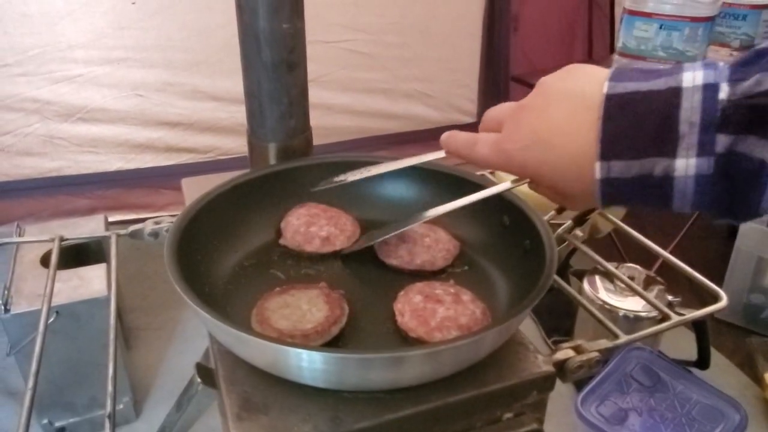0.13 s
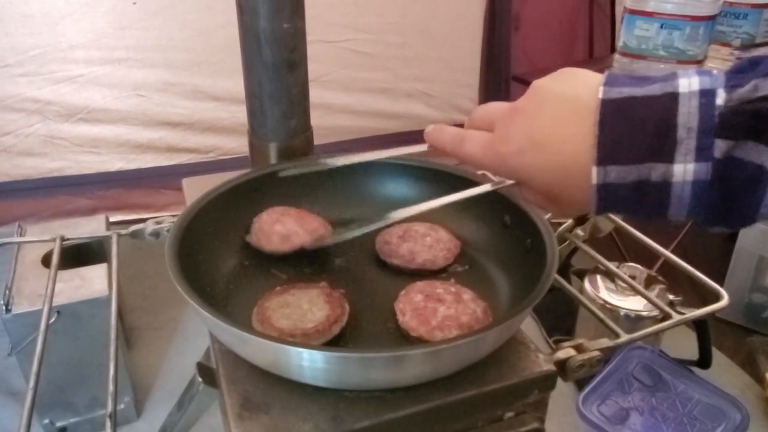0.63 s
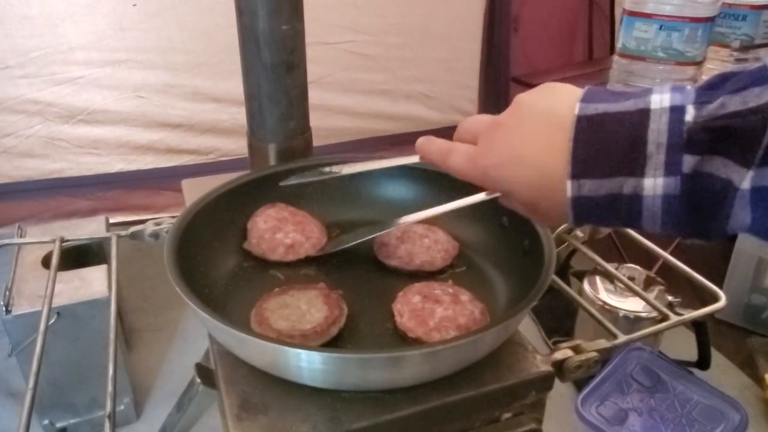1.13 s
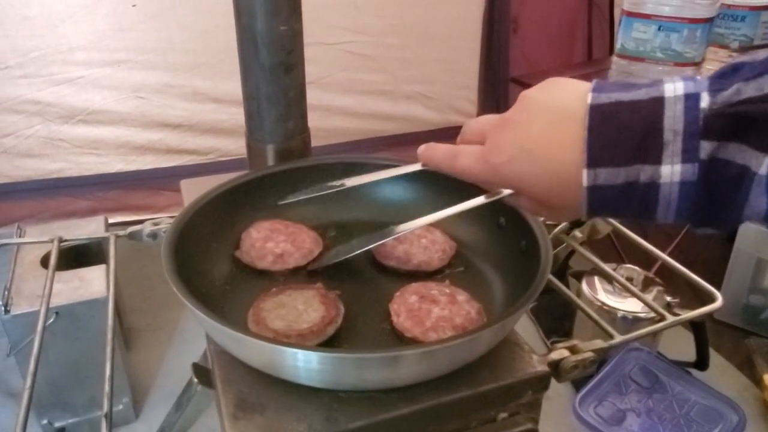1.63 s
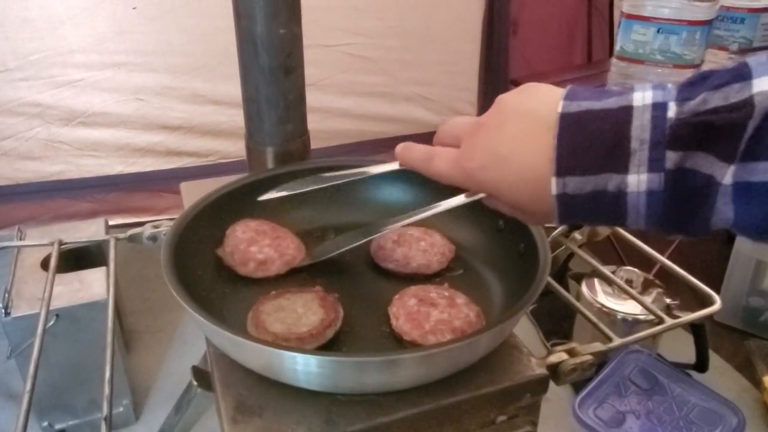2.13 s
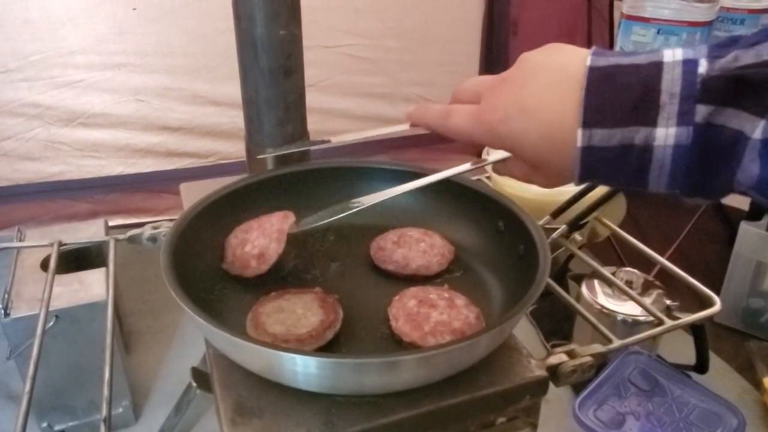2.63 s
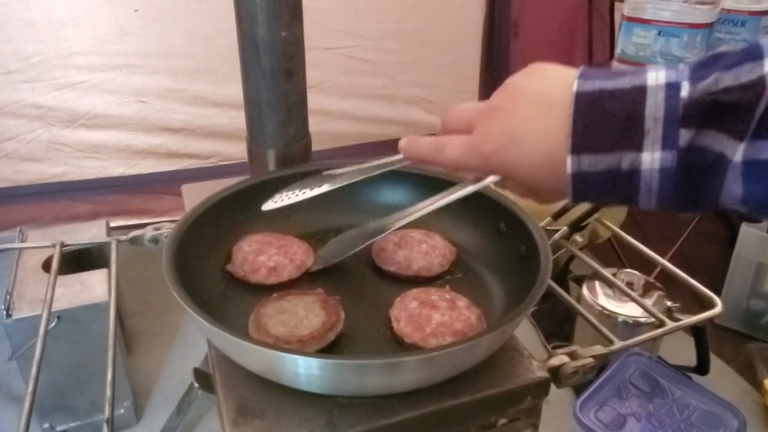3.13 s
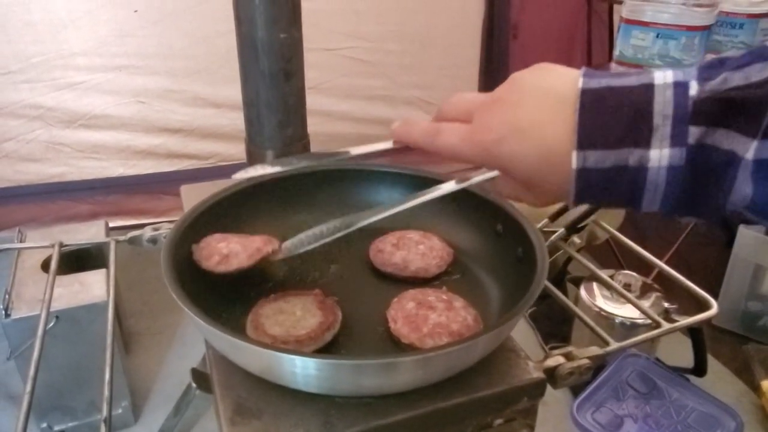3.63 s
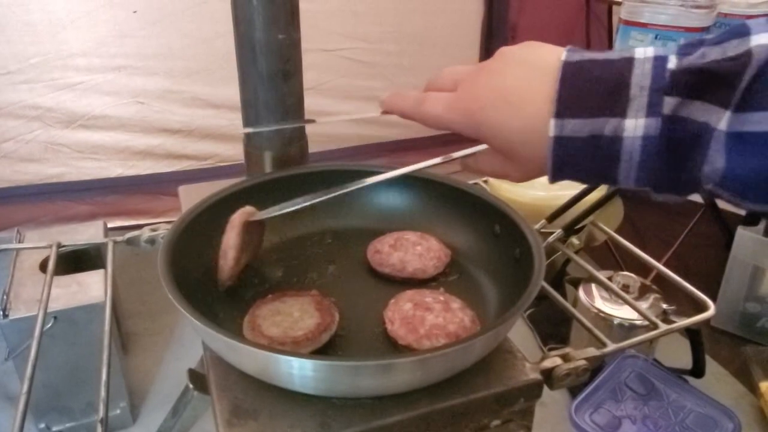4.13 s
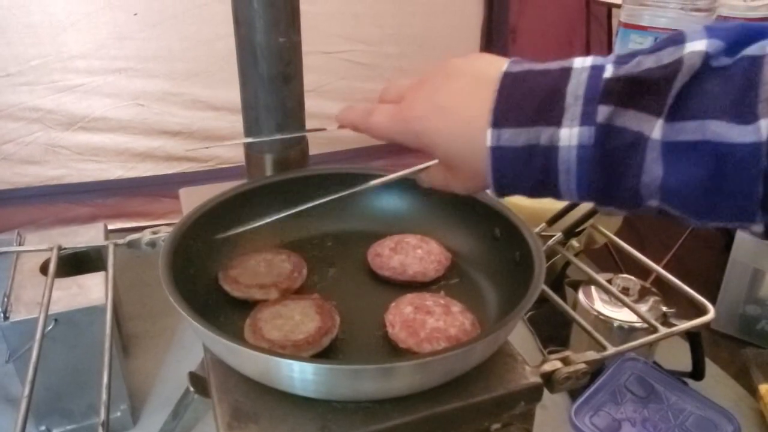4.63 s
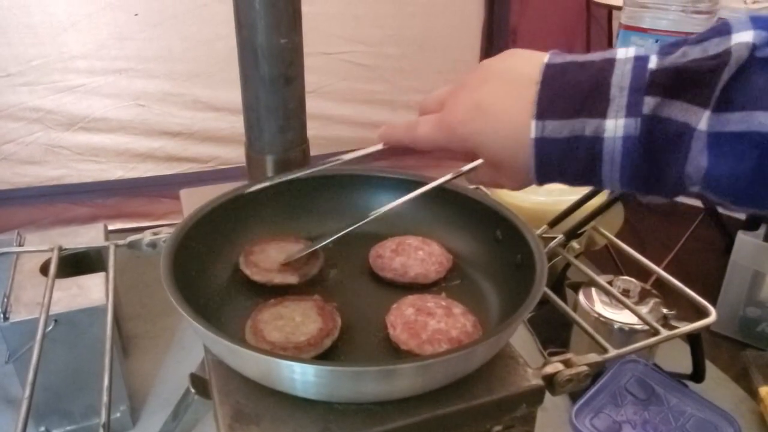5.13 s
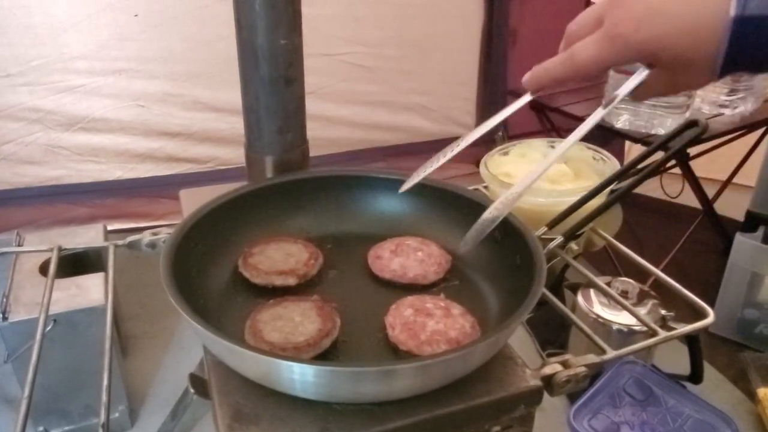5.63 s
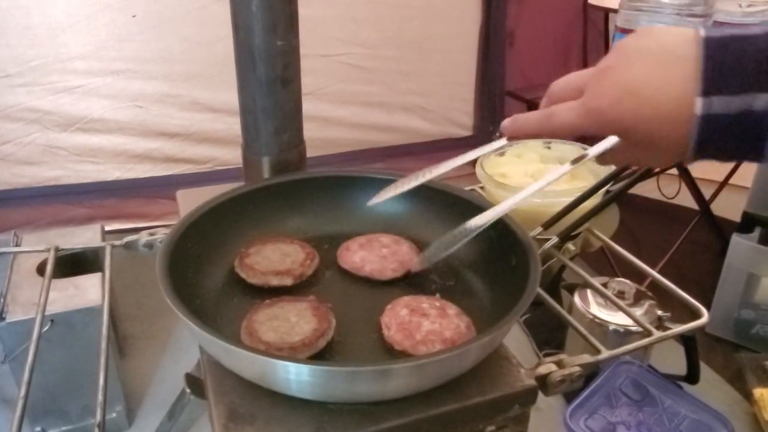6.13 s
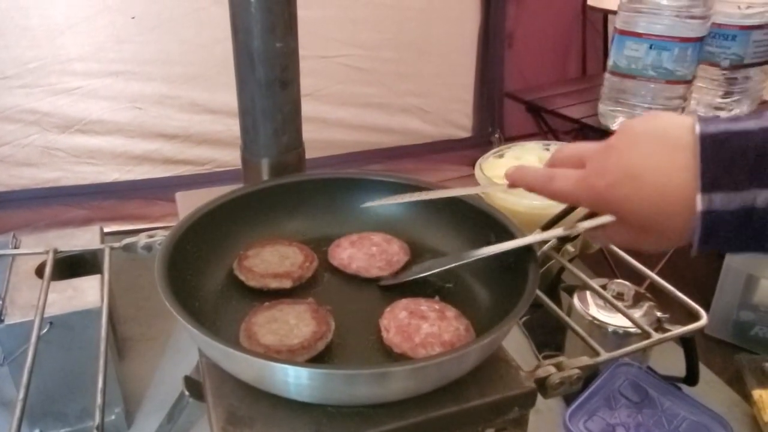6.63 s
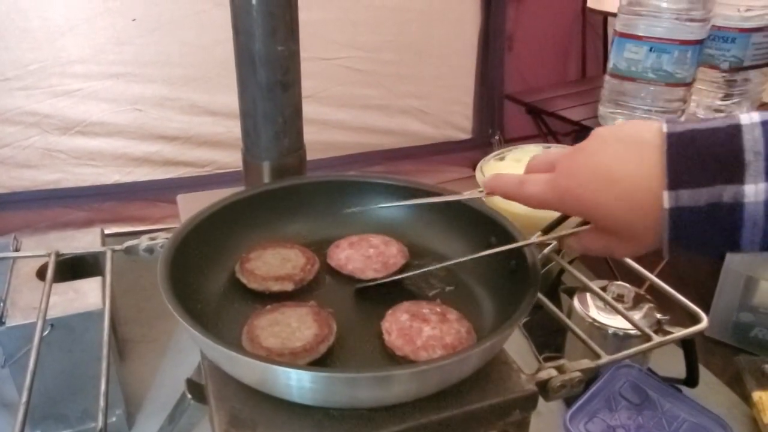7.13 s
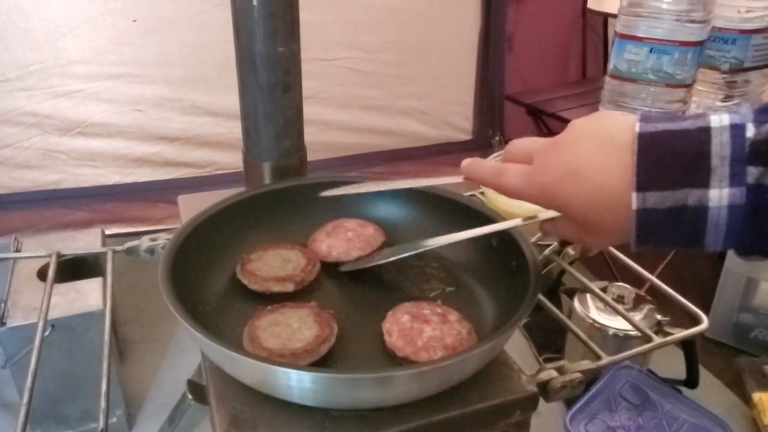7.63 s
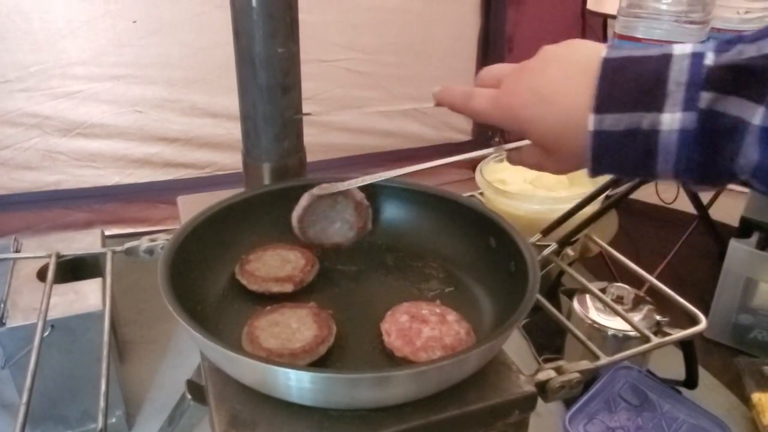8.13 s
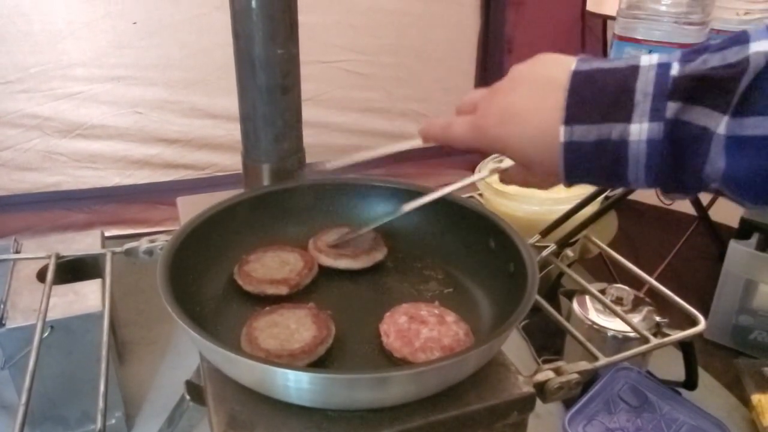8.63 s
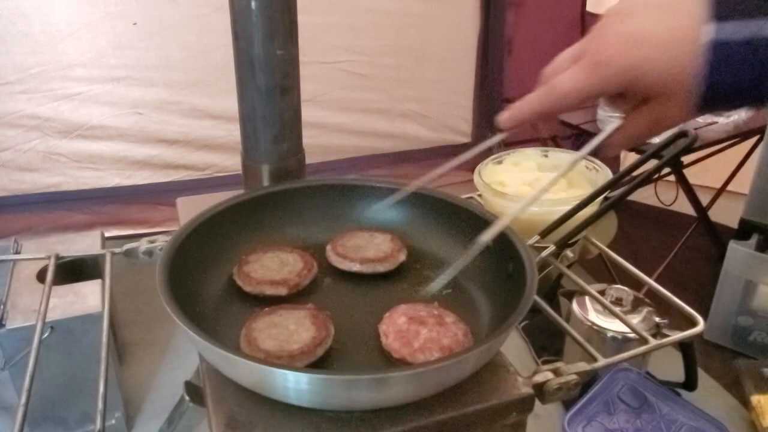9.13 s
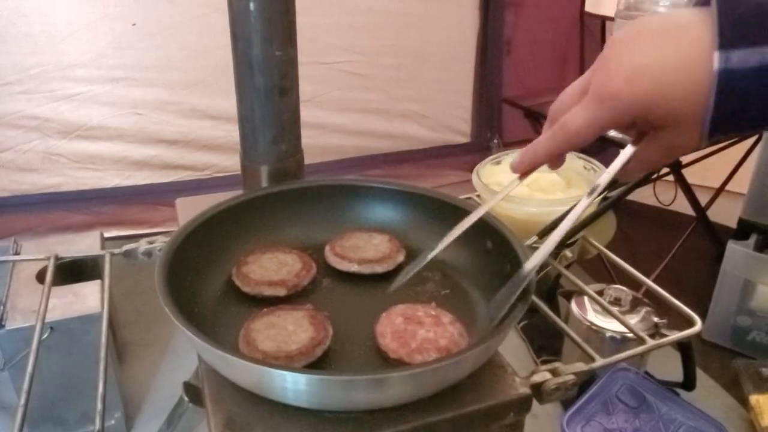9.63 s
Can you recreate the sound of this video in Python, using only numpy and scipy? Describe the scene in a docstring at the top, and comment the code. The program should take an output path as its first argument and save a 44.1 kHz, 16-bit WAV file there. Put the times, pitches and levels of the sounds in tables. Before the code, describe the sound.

Fat boils and crackles continuously in a pan, close to the microphone and leaning left. Early pops and low plops come thickly, then the middle is sparser. Tongs make faint scrapes, thuds and small clinks. Later a patty turns with a rush of spitting and a short rising steam whistle, before the sizzle settles and stops abruptly. Soft low draught and a dry, cloth-walled space surround it.

```python
"""Inside a tent, sausage patties fry in a metal pan on a stove, close to a two-port camera microphone.
Fat: random clicks ring as short bubble notes in four sizes, coloured by the pan; pops and low plops stand out.
Steam: uneven puffs drive a gliding resonance. Tongs: thuds, clinks and scrapes of uneven slips.
Stove draught: low-frequency noise in gusts. Echoes and a soft tail stand for pan wall and tent."""
import sys
import numpy as np
from scipy import signal
from scipy.fft import rfft, irfft, next_fast_len
from scipy.io import wavfile

SR = 44100
rng = np.random.default_rng(int(sys.argv[2]) if len(sys.argv) > 2 else 0)


def elevation(decibels):
    """Turn decibel levels (scalar or array-like) into linear amplitude ratios."""
    levels = np.asarray(decibels, float)
    return 10 ** (levels / 20)


def pcm_store(signal):
    """Save signal as 16-bit PCM."""
    levels = np.round(np.clip(np.atleast_2d(signal), -1, 1) * 32767)
    wavfile.write(sys.argv[1], SR, levels.astype(np.int16).T)


N = 430853
SPOTS = 10  # sounding places in the pan
SIZE = next_fast_len(N + 16384)
HZ = np.fft.rfftfreq(SIZE, 1 / SR)


def evened(x):
    """Scales to rms 1."""
    return x / np.sqrt(np.mean(x ** 2) + 1e-20)


def read(points, hz):
    """Reads a spectrum on a log-frequency axis."""
    f, value = np.transpose(points)
    return np.interp(np.log(hz + 1), np.log(f + 1), value)


def drift(hz):
    """Slow chance of rms 1: noise through two equal poles at hz, run at 1000 steps a second."""
    r = np.exp(-2 * np.pi * hz / 1000)
    noise = rng.standard_normal(N * 1000 // SR + 2)
    steps = signal.lfilter([1], [1, -2 * r, r * r], noise)
    return np.interp(np.arange(N) / SR * 1000, np.arange(len(steps)), evened(steps))


def bursts(per_s, spread_db):
    """Random clicks of random sign, a few of them large; rms 1."""
    at, size, sign = rng.random((3, round(per_s * N / SR)))
    clicks = np.zeros(N)
    size_db = spread_db * np.minimum(-np.log(size), 4.2)
    clicks[(at * N).astype(int)] = np.sign(sign - .5) * elevation(size_db)
    return evened(clicks)


def blip(hz, cycles):
    """One short burst: a tone of a few cycles under a bell centred 1.2 ms in."""
    t = np.arange(2048) / SR - .0012
    return np.sin(2 * np.pi * hz * t) * np.exp(-.5 * (t * hz * 4 / cycles) ** 2)


def ringing(x, hz, cycles):
    """Each click becomes a note that dies in a few cycles; energy is kept."""
    r = np.exp(-3 * hz / cycles / SR)
    c = np.cos(2 * np.pi * hz / SR)
    return signal.lfilter([1, 0, -1], [1, -2 * r * c, r * r], x) * np.sqrt((1 - r * r) / 2)


# Modes of the pan. Each row: frequency in Hz, relative strength at resonance in dB, t60 in s.
PAN_MODES = [(725, -19, .05), (1346, -12, .06), (1594, -16, .05), (1998, -13, .07), (2364, -14, .06),
             (2885, -14, .05), (3411, -11, .05), (4190, -16, .04)]


def pan_ring():
    """Response of the pan to a tap: decaying modes, scaled by decay rate."""
    t = np.arange(8192) / SR
    ring = 0
    for hz, db, t60 in PAN_MODES:
        ring = ring + elevation(db - 60 * t / t60) * np.sin(2 * np.pi * hz * t) * np.log(1000) / t60 / SR * 2
    return ring


def paths(lag_s=-0.000034, spread_s=.8e-4, wall=0.48, t60=0.18, tent_db=-10):
    """From each spot to both ports: small delay between ports, pan wall echoes, soft tail of the tent."""
    lag = lag_s + spread_s * rng.standard_normal(SPOTS)
    echo_s = rng.uniform(0.00016, 3e-3, (SPOTS, 2, 4))
    echo = wall * rng.standard_normal((SPOTS, 2, 4))
    t = np.arange(8192) / SR
    taps = rng.standard_normal((SPOTS, 2, 8192)) * elevation(-60 * t / t60) * (t > .003)
    taps *= elevation(tent_db) / np.linalg.norm(taps[0, 0])
    np.put_along_axis(taps, (echo_s * SR).astype(int), echo, 2)
    reflected = (1j * HZ / (1j * HZ + 1400)) ** 2  # long waves bend round the wall and pass the cloth
    h = 1 + reflected * rfft(taps, SIZE)
    h[:, 0] *= np.exp(-2j * np.pi * HZ * lag[:, None])
    energy = 1 + abs(reflected) ** 2 * (taps ** 2).sum(2)[..., None]
    return h / np.sqrt(energy)


def place(rows, path):
    """Sets (start s, left over right dB, sound) rows at the spots in turn and sends them to both ports."""
    lanes = np.zeros((SPOTS, 2, SIZE))
    for k, (s, pan_db, sound) in enumerate(rows):
        at = round(s * SR)
        sides = elevation(np.array([[pan_db / 2], [-pan_db / 2]]))
        lanes[k % SPOTS, :, at:at + sound.shape[-1]] += sides * sound
    return irfft((rfft(lanes) * path).sum(0), SIZE)[:, :N]


# Spectrum of the draught. Each row: frequency in Hz, relative density in dB per Hz.
DRAUGHT_SPECTRUM = [(12, -42), (20, -43), (55, 4), (81, 0), (184, -1), (316, -21), (458, -50), (600, -17),
                    (780, -12), (1320, -120)]
DRAW_DB, DRAW_SAG_DB_PER_S, GUST_DB, GUSTS_HZ = -49.5, 0.33, 1.7, 6.7


def draught(same=.98):
    """Air drawn through the stove: low gusty noise that weakens slowly, nearly alike at both ports."""
    a, b = rfft(rng.standard_normal((2, SIZE))) * elevation(read(DRAUGHT_SPECTRUM, HZ))
    pair = irfft(np.array([a, same * a + np.sqrt(1 - same ** 2) * b]), SIZE)[:, :N]
    level_db = DRAW_DB - DRAW_SAG_DB_PER_S * np.arange(N) / SR + GUST_DB * drift(GUSTS_HZ)
    return elevation(level_db) * evened(pair)


# Tongs slide under a patty. Each row: start in s, length in s, level in dB, lower pitch in Hz.
TONG_SCRAPES = [(0.274, 0.13, -35.5, 2130), (1.015, 0.28, -39, 1460), (1.56, 0.97, -43.5, 1380),
                (4.75, 0.53, -50.5, 950), (7.537, .2, -40, 2280), (7.902, 0.99, -40, 1850),
                (9.58, .17, -52, 770)]
SLIPS_PER_S, SLIP_CYCLES = 520., 6.1


def scrape(s, length_s, db, hz):
    """Steel drags through the crust in uneven slips that ring at two pitches, weakening along the way."""
    u = np.arange(round(length_s * SR)) / (length_s * SR)
    slips = bursts(SLIPS_PER_S, 4.4)[:len(u)]
    grit = ringing(slips, hz, SLIP_CYCLES) + 0.96 * ringing(slips, hz * 1.34, SLIP_CYCLES)
    return s, 2.6, elevation(db - 3.4 * u) * signal.windows.tukey(len(u), .3) * evened(grit)


# Tongs on the pan. Each row: start in s, level in dB, thud in Hz, clink in dB re thud before CLINK_LIFT_DB.
TONG_KNOCKS = [(0.835, -38.5, 475, 6.5), (1.625, -41.5, 423, 6.5), (2.046, -37.5, 295, -4),
               (3.051, -34.5, 424, -3), (6.258, -52, 730, -2), (6.469, -33.5, 475, -17),
               (8.257, -41, 686, -4), (9.596, -35.5, 314, -14), (9.708, -35.5, 335, -15)]
THUD_CYCLES, RATTLE_DB, RATTLE_T60_S, CLINK_LIFT_DB = 30, -14, 0.87, 8.5  # thud: cycles per 60 dB


def knock(s, db, hz, clink_db):
    """Tongs touch the pan: a dull thud, a clink of the pan's modes, and the stove top rattles on."""
    t = np.arange(16384) / SR
    thud = np.sin(2 * np.pi * hz * t) * elevation(-60 * t * hz / THUD_CYCLES) * (1 - np.exp(-t / 0.0007))
    both, apart = rng.standard_normal(16384), rng.standard_normal((2, 16384))
    band = signal.butter(2, [260 / SR * 2, 650 / SR * 2], "band")
    rattle = evened(signal.lfilter(*band, both + 0.5 * apart))
    fading = elevation(-60 * t / RATTLE_T60_S + RATTLE_DB) * signal.windows.tukey(16384, .1)
    clink = np.pad(signal.fftconvolve(blip(1510, 2.2), pan_ring())[:8192], (0, 8192))
    clink = elevation(clink_db + CLINK_LIFT_DB) * clink / abs(clink).max()
    return s, .5, elevation(db) * (thud + rattle * fading + clink)


# Steam escaping under the lifted patty. Each row: time in s, level in dB, pitch in Hz.
PATTY_SQUEAL = [(8.08, -33, 3300), (8.2, -39, 3240), (8.27, -40, 2760), (8.32, -34, 2850),
                (8.37, -25.5, 3560), (8.41, -28, 3500), (8.45, -28, 3870), (8.49, -34, 4100),
                (8.57, -30, 4470), (8.64, -45, 4500)]


def squeal(rows, width_hz, pan_db):
    """Quick uneven puffs of steam sound through a gap: a two-pole resonance glides along the rows."""
    s, db, hz = np.transpose(rows)
    t = np.arange(s[0], s[-1], 1 / SR)
    puffs = (bursts(2500., 3.0) * elevation(3.0 * drift(60.)))[:len(t)]
    turn = np.exp(2j * np.pi * np.cumsum(np.interp(t, s, hz)) / SR)
    r = np.exp(-np.pi * width_hz / SR)
    # filter around 0 Hz, then turn up to the moving pitch
    tone = (turn * signal.lfilter([1], np.convolve([1, -r], [1, -r]), puffs / turn)).real
    return s[0], pan_db, evened(tone) * elevation(np.interp(t, s, db)) * signal.windows.tukey(len(t), .15)


# Thin jets from under a patty's rim. Each row: start in s, length in s, top level in dB, first Hz, last Hz.
STEAM_JETS = [(0.402, 0.41, -38, 6300, 6800), (1.222, .44, -32, 7350, 9800),
              (2.239, 0.57, -38.5, 6900, 6520), (3.596, .56, -35, 5900, 6600),
              (7.55, 0.41, -34.5, 6500, 7000), (7.952, 1, -38, 6200, 6600)]
JET_WIDTH_HZ, JET_ENDS_DB, JET_TOP = 2100., -11, .62  # top: share of the length


def jet(s, length_s, db, first_hz, last_hz):
    """A jet of steam swells to its height past the middle and then fades."""
    top_hz = first_hz + JET_TOP * (last_hz - first_hz)
    rows = [(s, db + JET_ENDS_DB, first_hz),
            (s + JET_TOP * length_s, db, top_hz),
            (s + length_s, db + JET_ENDS_DB, last_hz)]
    return squeal(rows, JET_WIDTH_HZ, 2.0)


# Dull low plops of fat. Each row: start in s, level in dB, pitch in Hz.
LOW_PLOPS = [(0.286, -28, 2010), (0.578, -28.5, 1580), (0.65, -28.5, 1410), (0.907, -27, 2000),
             (1.023, -29, 1380), (1.044, -26, 1430), (1.074, -29, 1630), (1.134, -38, 2030),
             (1.174, -37, 2190), (1.219, -27, 2100), (1.251, -34, 2030), (1.311, -24, 2340),
             (1.355, -32, 1560), (1.594, -27, 2430), (5.573, -24, 1990), (5.732, -22, 1420),
             (5.848, -30, 2010), (6.259, -24, 1370), (6.695, -34, 1360), (6.818, -23.5, 1980),
             (7.554, -20.5, 2220), (7.596, -22, 2360), (8.47, -30, 2380)]


def plop(s, db, hz):
    """A dull low plop of fat: a blunt low burst and a little pan ring."""
    burst = blip(hz, 3.04) + 0.22 * blip(hz * 0.48, 2.03) + 0.72 * blip(hz * 2.1, 8.4)
    ring = signal.fftconvolve(burst, pan_ring())[:8192]
    return s, 2.2, elevation(db) * (np.pad(burst, (0, 8192 - 2048)) + 3.8 * ring)


# Loud pops of fat. Each row: start in s, level in dB before POP_TRIM_DB, pitch in Hz,
# low part in dB re note before LOW_LIFT_DB, snap in dB re note before SNAP_LIFT_DB.
FAT_POPS = [(0.0578, -15, 3480, -25, -8), (0.3275, -19, 3630, -24, -5), (0.38, -24.5, 2200, -19, 0),
            (0.4056, -12, 3900, -21.5, -12), (0.598, -15, 3400, -22, -10), (0.633, -27, 3390, -24, -14),
            (0.7095, -12.5, 4300, -23, -3), (0.7695, -17.5, 4330, -29, -9), (0.8235, -28, 3800, -15, -5),
            (0.8378, -15, 3420, -17.5, -15), (0.9435, -16, 4270, -21, -21),
            (0.9779, -16.5, 3680, -20, -2.5), (1.5574, -22, 3800, -9.5, -12), (1.703, -25, 3310, -12, -9),
            (1.7219, -19, 3700, -29, -5), (2.3205, -20.5, 3450, -28, -1), (2.4453, -16.5, 3500, -22, -17),
            (2.5172, -21, 5360, -22, -6), (2.5376, -17.5, 4270, -30, -4), (2.689, -20, 3200, -17, -6),
            (2.8348, -17.5, 3240, -26, -5), (2.894, -25, 3360, -31, -2), (2.9355, -15, 3500, -19.5, -6),
            (2.9788, -23, 3530, -18, -9), (3.0096, -17, 3450, -22, -4.5), (3.054, -12.5, 3400, -15.5, -9),
            (3.1488, -13, 3570, -26, -11), (3.196, -16, 3650, -29, -16), (3.7254, -13.5, 5200, -39, -22),
            (3.8327, -25, 3500, -37, 4), (3.8844, -17, 5470, -31, -19), (3.922, -19.5, 3830, -25, -12),
            (4.4628, -18, 4250, -23, -12), (4.506, -14, 5230, -39, -17), (4.7214, -17.5, 3380, -22, -3.5),
            (4.9767, -20.5, 3750, -26, 0), (5.0596, -14.5, 3470, -20, -11), (5.4256, -16.5, 3640, -31, -9),
            (5.45, -22, 3460, -10, -17), (5.5639, -17.5, 3660, -24, -2), (5.6123, -16.5, 3450, -21, -6),
            (5.691, -16.5, 3440, -20, -7), (5.872, -20, 4130, -23, -5), (5.9663, -22, 3660, -26, -5),
            (6.0112, -19, 3520, -28, -6), (6.131, -23.5, 3370, -13, 3.5), (6.1504, -16, 3500, -21, -7),
            (6.179, -20.5, 3450, -22, -2), (6.3068, -17, 3800, -16, -9), (6.3689, -26, 3390, -27, 1),
            (6.6261, -29, 3560, -25, -9), (6.6945, -24, 3520, -14, -6), (6.7077, -20.5, 3470, -16, -3),
            (7.0817, -23, 4680, -25, -12), (7.202, -21, 4470, -24, -2), (7.2358, -18, 3840, -22, -6),
            (7.4624, -19.5, 3480, -16, 1), (7.5752, -15.5, 2380, -14, -3), (7.6307, -13, 4640, -24, -12),
            (7.7022, -18.5, 3240, -17, 0), (7.748, -22, 3700, -21, -4), (7.7682, -23, 2860, -19, -3),
            (7.855, -14, 3970, -14.5, -8), (8.1662, -13, 3320, -31, -10), (8.236, -11.5, 3270, -39, -14),
            (8.2591, -14, 3300, -29, -9), (8.297, -15, 3140, -30, -16), (8.3589, -20, 3460, -31, -14),
            (8.3822, -6.5, 3660, -41, -21), (8.4402, -10, 4090, -43, -20), (8.4976, -11.5, 4080, -25, -15),
            (8.527, -16, 3320, -19, -4), (8.5526, -12.5, 3420, -17.5, -9), (8.61, -12, 4330, -25, -15),
            (8.6981, -16.5, 3430, -27, -16), (9.0579, -16, 3450, -22, -16), (9.111, -23, 4320, -31, 2.5),
            (9.18, -19, 3550, -23, -5), (9.591, -16, 3570, -17, -6), (9.7357, -18, 3890, -19, -13)]
POP_TRIM_DB, LOW_LIFT_DB, SNAP_LIFT_DB = -0.5, 4.6, 8.0
POP_LEFT_DB, POP_SCATTER_DB = 5.5, 3.5  # left over right


def pop(s, db, hz, low_db, treble_db):
    """A big bubble bursts: a short note, a low plop, a bright snap, a few droplets, and the pan rings after."""
    note = blip(hz, 4.5) + .4 * blip(hz * 1.4, 4) + .15 * blip(hz * .65, 3)
    low = elevation(low_db + LOW_LIFT_DB) * (blip(1470, 3.1) + 0.18 * blip(710, 2.5))
    snap = blip(10600, 5.5) + .7 * blip(14300, 6.5) + 0.59 * blip(6800, 7.2)
    snap = elevation(treble_db + SNAP_LIFT_DB) * snap
    droplets = rng.standard_normal(2048) ** 3 * elevation(-60 * np.arange(2048) / SR / 0.12)
    spray = 0.0091 * signal.fftconvolve(droplets, note + low + snap)[:2048]
    burst = note + low + snap + spray
    ring = signal.fftconvolve(burst, pan_ring())[:8192]
    whole = np.pad(burst, (0, 8192 - 2048)) + 2.07 * ring
    left_db = POP_LEFT_DB + POP_SCATTER_DB * rng.standard_normal()
    return s, left_db, elevation(db + POP_TRIM_DB) * whole


# How the fat boils. Each row: time in s, boil in dB, large bubbles in dB over the boil.
BOIL_COURSE = [(0.0, -33.5, -10), (0.6, -30, -14.5), (0.97, -32.5, -10), (1.45, -30, -16),
               (1.7, -33, -13.5), (2.3, -33, -13), (2.9, -32.5, -16), (3.3, -32, -7), (3.6, -31.5, -16.5),
               (4.3, -32.5, -15), (4.75, -30, -11.5), (5.2, -29.5, -12.5), (5.78, -31, -16),
               (6.24, -29.5, -14), (6.65, -31, -13.5), (7.4, -30.5, -13), (7.85, -28.5, -14),
               (8.05, -25, -13.5), (8.6, -25.5, -17), (9.0, -28.5, -17), (9.75, -30.5, -17.5)]
# Short flare-ups as the patties are nudged. Each row: centre in s, length in s,
# dB over the boil (negative: a lull), bubble pitch in Hz.
FLARE_UPS = [(0.06, .04, 5, 4500), (0.345, 0.067, 1, 5000), (0.6, 0.11, 10, 6030), (0.6, 0.034, 4, 3500),
             (0.75, 0.017, 2, 12000), (1.1, 0.18, -7, 1460), (1.474, 0.079, 2.5, 8800),
             (1.578, 0.021, 7, 13000), (2.07, 0.049, 4.5, 3520), (2.365, 0.13, 6.5, 7100),
             (3.128, 0.041, 3, 3500), (3.14, .02, 6, 11000), (3.34, 0.025, 9, 9000), (3.91, .1, 0.5, 6940),
             (4.548, 0.057, 3.5, 4000), (5.163, 0.048, 15, 5650), (5.434, 0.025, 1, 13000),
             (6.163, 0.041, -3, 3000), (6.832, 0.05, 6, 10000), (7.573, 0.024, 4, 3000),
             (7.7, 0.1, 4, 6500), (7.985, 0.055, 8.5, 8900), (9.603, 0.04, 7, 5000),
             (9.747, 0.0071, 11.5, 7860)]
FLARE_OCTAVES = 0.46  # reach into neighbouring sizes


def boil(lo, hi, coarse_share):
    """Strength in dB over time of bubbles from lo to hi Hz: the boil, its coarseness and the flare-ups."""
    t = np.arange(0, N, 64) / SR
    octave = np.log2(lo * hi) / 2
    s, db, coarse_db = np.transpose(BOIL_COURSE)
    level_db = np.interp(t, s, db + coarse_share * coarse_db)
    for at, length_s, flare_db, hz in FLARE_UPS:
        off_time, off_pitch = (t - at) / length_s, (octave - np.log2(hz)) / FLARE_OCTAVES
        level_db = level_db + flare_db * np.exp(-off_time ** 2 - off_pitch ** 2)
    return np.interp(np.arange(N) / SR, t, level_db)


# Bubble sizes. Each row: lowest Hz, highest Hz, cycles, bursts per s, size spread in dB,
# share of common cracks 0-1, level in dB over the boil, coarseness share 0-1.
BUBBLE_SIZES = [(8740, 17300, 7, 9000., 4.5, 0.25, 1.2, 0), (5970, 10380, 4.1, 6000., 6, 0.36, -6, 0),
                (2380, 5330, 2.55, 3500., 4, 0.31, -2, 0.23),
                (303, 2360, 2.63, 1500., 2.5, 0.55, -2.5, 0.91)]
# Fat, pan bowl and microphone. Each row: frequency in Hz, relative density in dB per Hz.
FAT_COLOUR = [(250, -17.5), (420, -17), (562, -18), (823, -13), (1380, -4.5), (1710, -9), (2000, -4),
              (2510, -7.5), (3360, 0), (4920, -4.5), (6480, -3), (9640, -8), (11100, -1.5), (15200, -4),
              (16200, -11)]
CRACKS_PER_S, CRACK_SPREAD_DB = 450., 3.5  # sharp bursts heard in every size


def sizzle(path, sputter_db=1.0, clump_db=2.5):
    """Bubbles burst in clumps at every spot and ring the pan; every size follows the boil."""
    out = 0
    sputter = elevation(sputter_db * drift(20.4))  # the whole pan spits in fits
    cracks = [bursts(CRACKS_PER_S / SPOTS, CRACK_SPREAD_DB) for _ in path]
    shape = elevation(read(FAT_COLOUR[:-1], HZ)) * (1 + 2.25 * rfft(pan_ring(), SIZE))  # last row not used
    for lo, hi, cycles, per_s, spread_db, share, size_db, coarse in BUBBLE_SIZES:
        level = elevation(boil(lo, hi, coarse) + size_db)
        notes_hz = np.linspace(lo, hi, 3 * SPOTS).reshape(3, SPOTS).T
        spectrum = 0
        for h, crack, three_hz in zip(path, cracks, notes_hz):
            clumps = elevation(clump_db * drift(29.0)) * np.sqrt(1 - share ** 2)
            spot = 0
            for hz in three_hz:
                clicks = share * crack + clumps * bursts(per_s / SPOTS / 3, spread_db)
                spot = spot + ringing(clicks, hz, cycles)
            spectrum = spectrum + h * rfft(spot * level * sputter, SIZE)
        layer = irfft(spectrum * shape, SIZE)[:, :N]
        out = out + evened(layer) * np.sqrt(np.mean(level ** 2))
    return out


# Balance of the ports. Each row: frequency in Hz, left over right in dB.
PORT_TILT = [(60, 0.5), (110, 0.5), (200, -7), (380, 5.5), (700, 7.5), (1290, 0), (2380, 4.5), (4400, 4.5),
             (8120, 1.5), (15000, 0.5)]


def facing(fat):
    """The left port faces the pan: a level difference between ports that varies with frequency."""
    sides = elevation(read(PORT_TILT, HZ) / 2 * np.array([[1], [-1]]))
    return irfft(rfft(fat, SIZE) * sides, SIZE)[:, :N]


def scene():
    """Draught, single sounds and sizzle; the single sounds rise clear of the pan wall."""
    singles = [scrape(*row) for row in TONG_SCRAPES]
    singles += [knock(*row) for row in TONG_KNOCKS]
    singles += [squeal(PATTY_SQUEAL, 650.0, 7.9)]
    singles += [jet(*row) for row in STEAM_JETS]
    singles += [plop(*row) for row in LOW_PLOPS]
    singles += [pop(*row) for row in FAT_POPS]
    clear = paths(spread_s=3e-5, wall=.2, tent_db=-9)
    return draught() + place(singles, clear) + facing(sizzle(paths()))


def top_cut(x):
    """Nothing passes above the cut-off."""
    return signal.sosfilt(signal.butter(12, 17090, fs=SR, output="sos"), x)


def record(dry):
    """The sound fades at the very end; the band ends sharply at 15.83 kHz."""
    fade_db = np.interp(np.arange(N) / SR, [9.755, 9.76, 9.77], [0, -14, -30])
    edge = signal.firwin(511, 15830, window=("kaiser", 9), fs=SR)
    mix = signal.oaconvolve(dry * elevation(fade_db), edge[None], "same")
    return top_cut(mix)


dry = scene()
out = record(dry)
pcm_store(out)
```